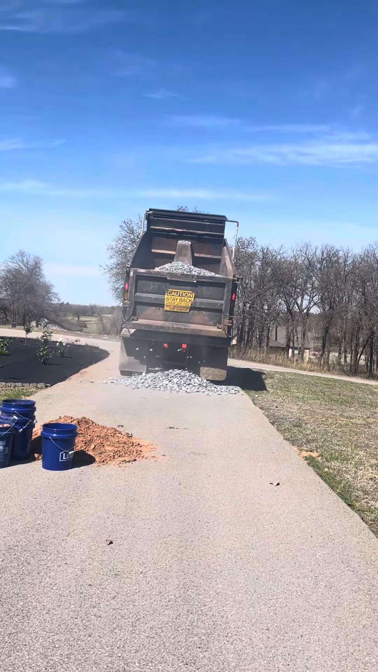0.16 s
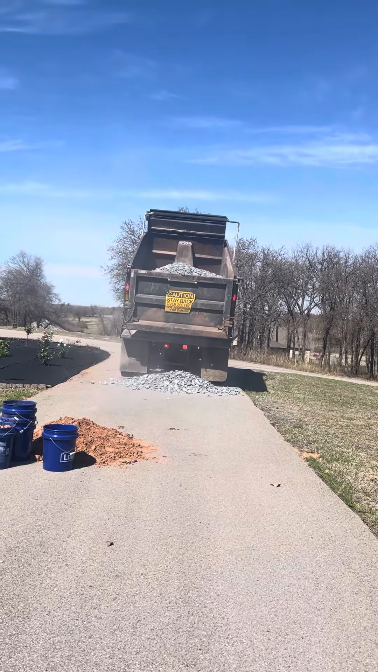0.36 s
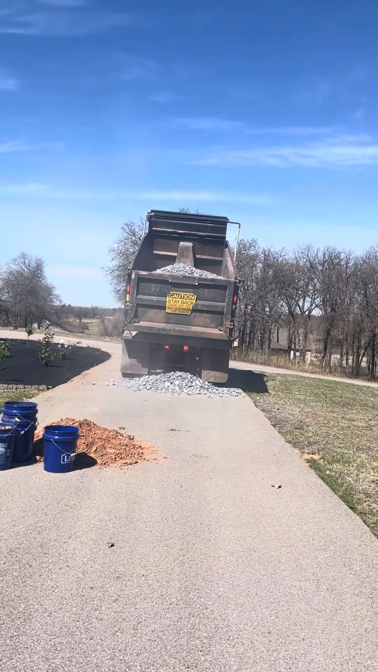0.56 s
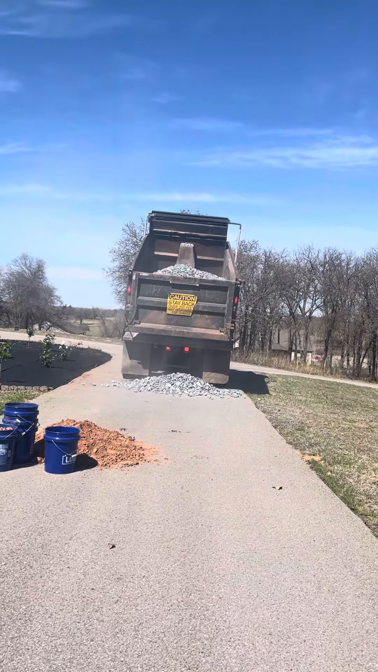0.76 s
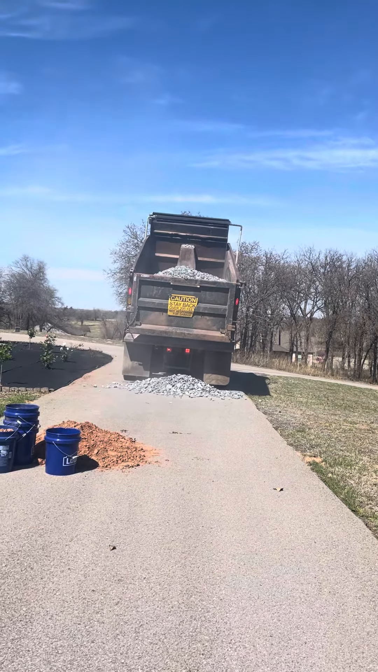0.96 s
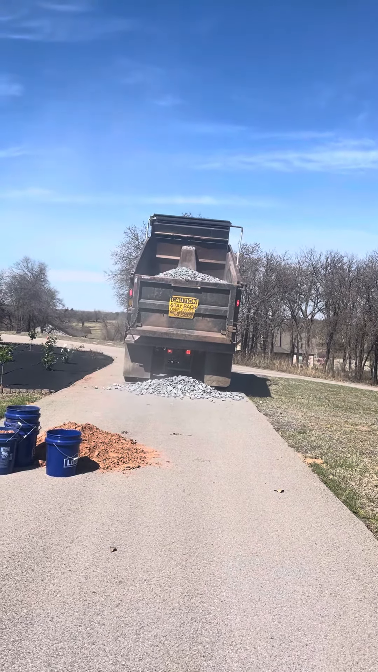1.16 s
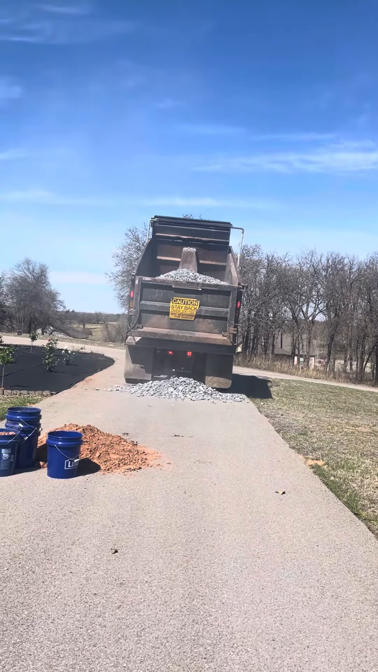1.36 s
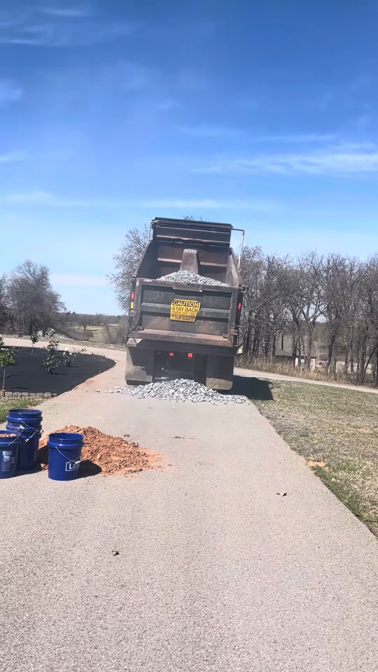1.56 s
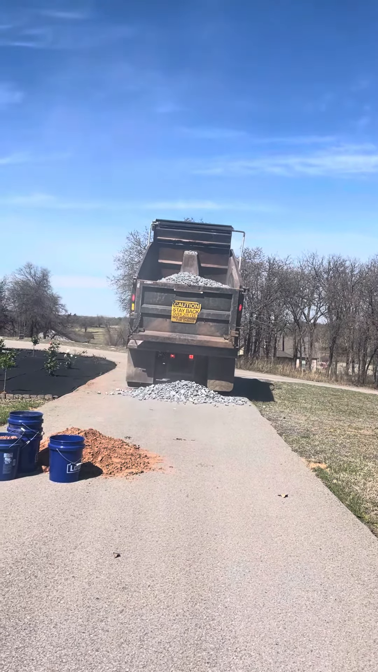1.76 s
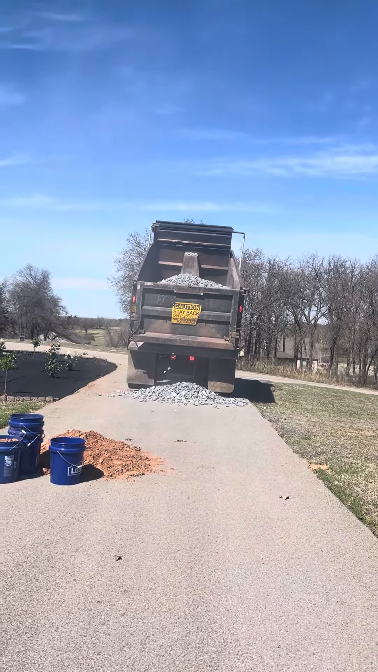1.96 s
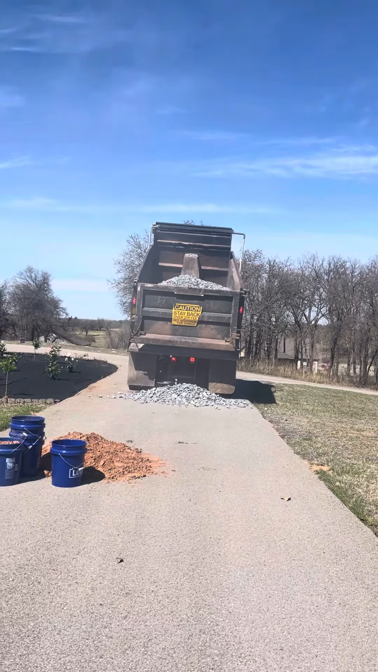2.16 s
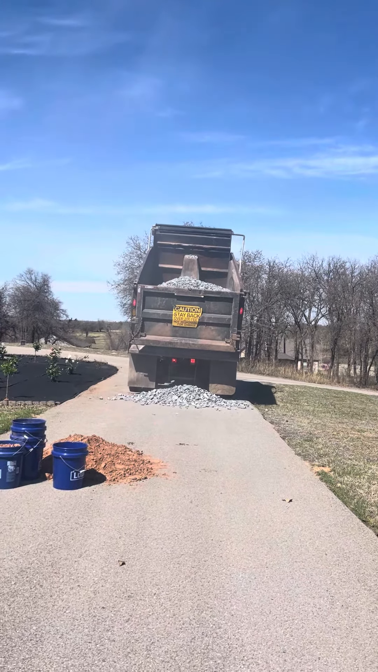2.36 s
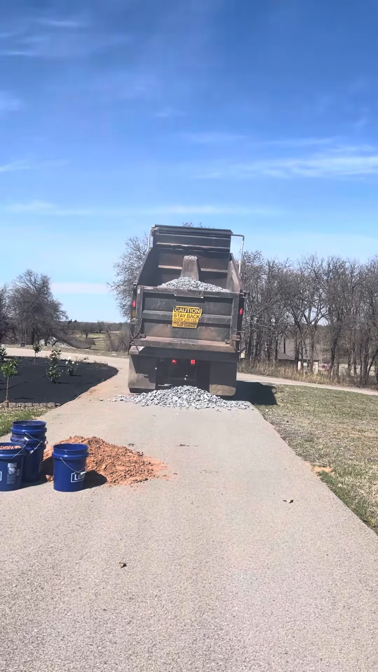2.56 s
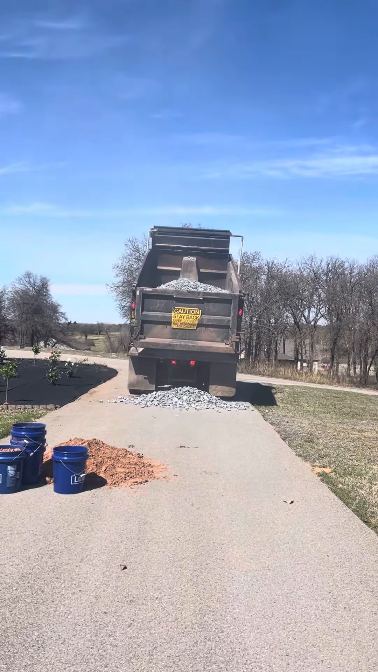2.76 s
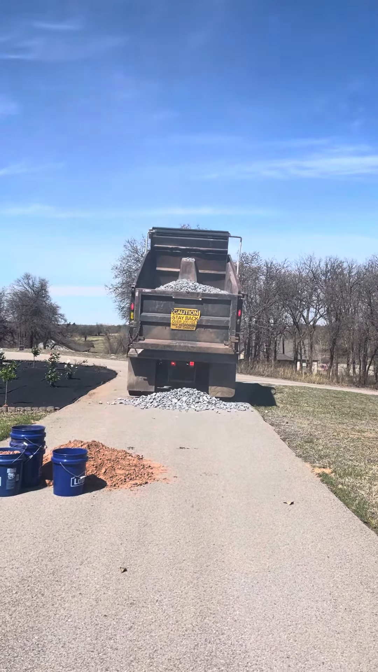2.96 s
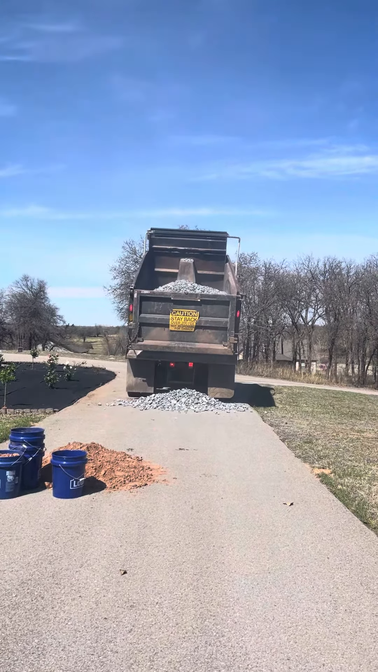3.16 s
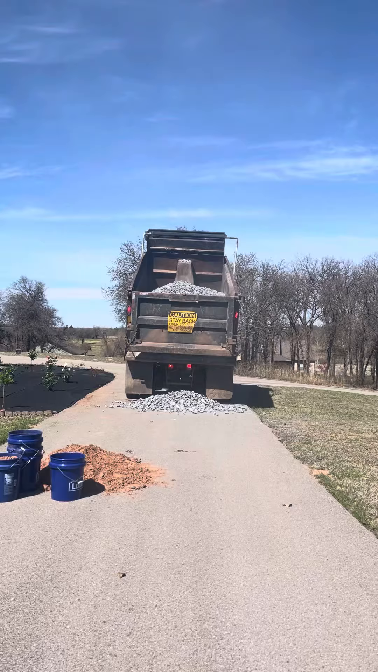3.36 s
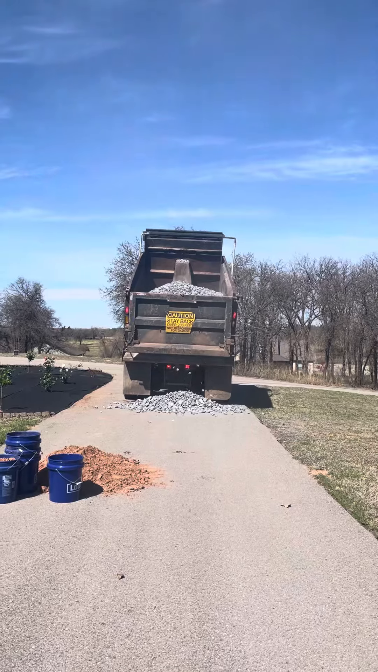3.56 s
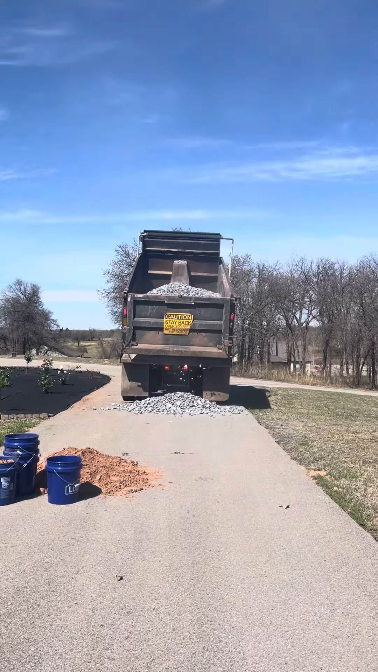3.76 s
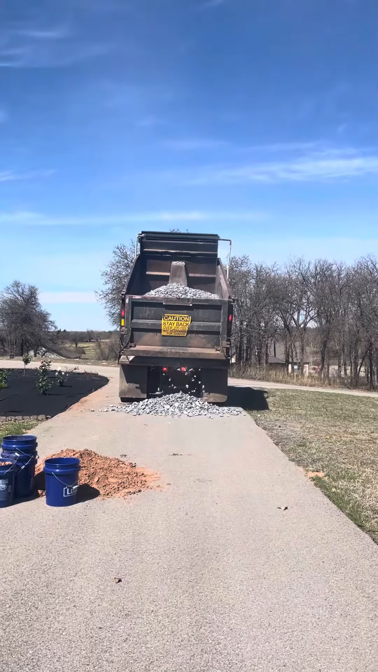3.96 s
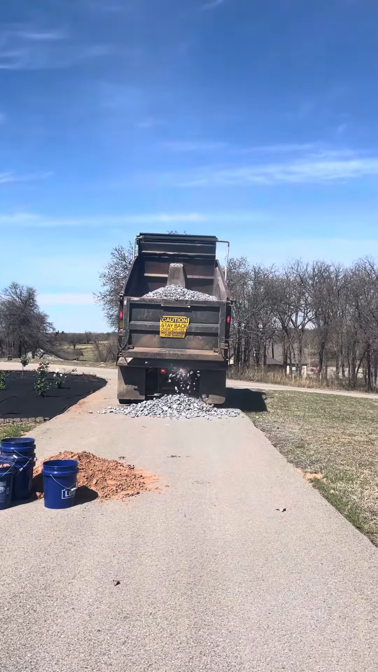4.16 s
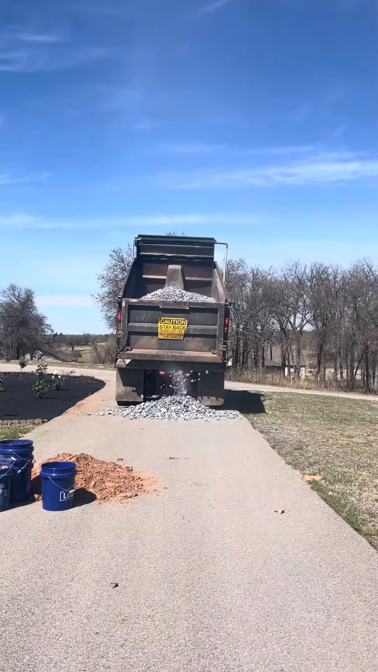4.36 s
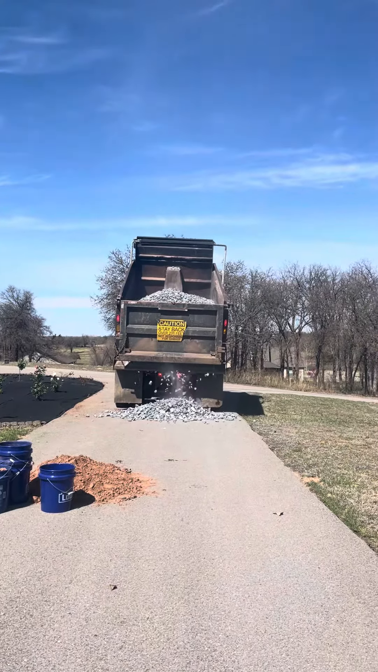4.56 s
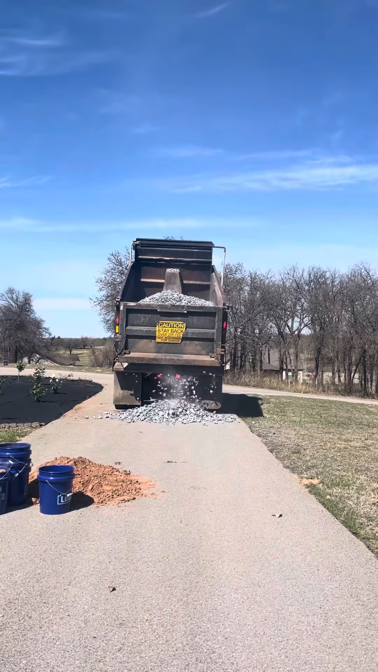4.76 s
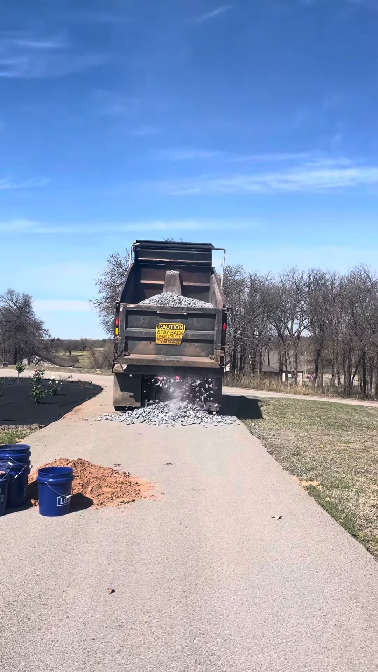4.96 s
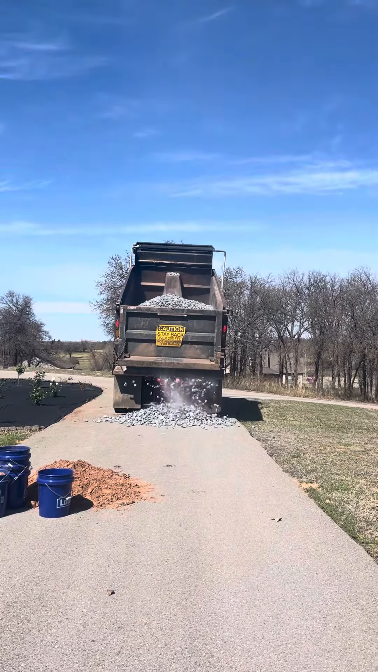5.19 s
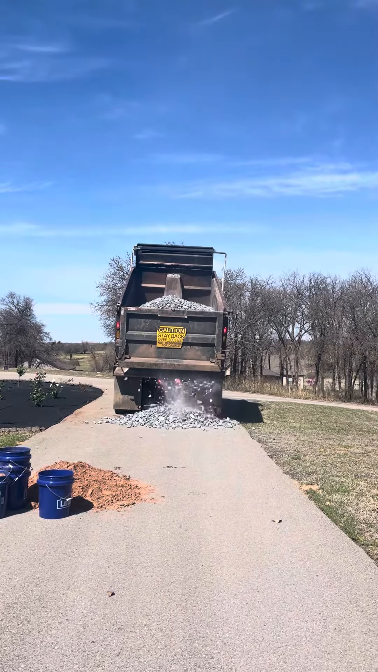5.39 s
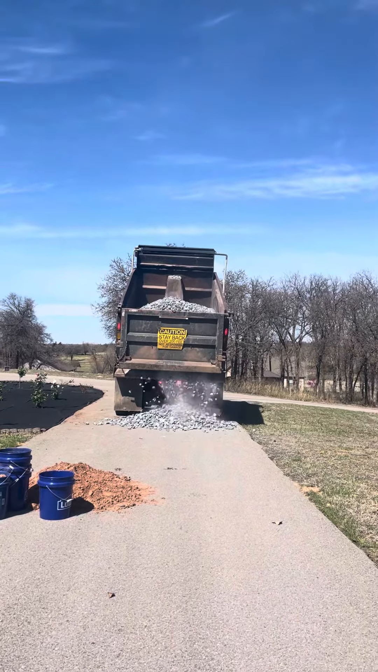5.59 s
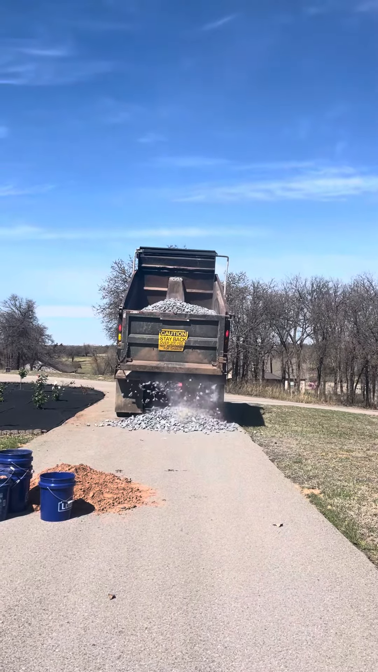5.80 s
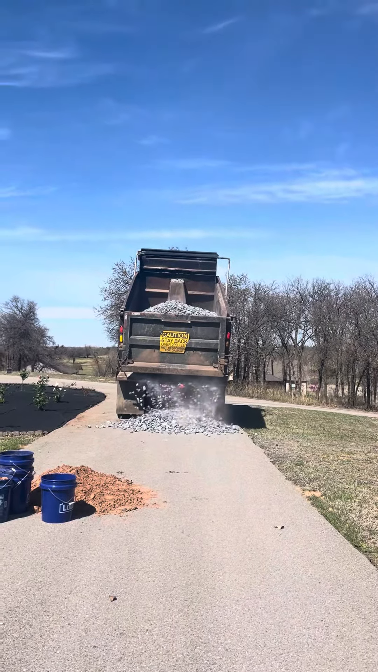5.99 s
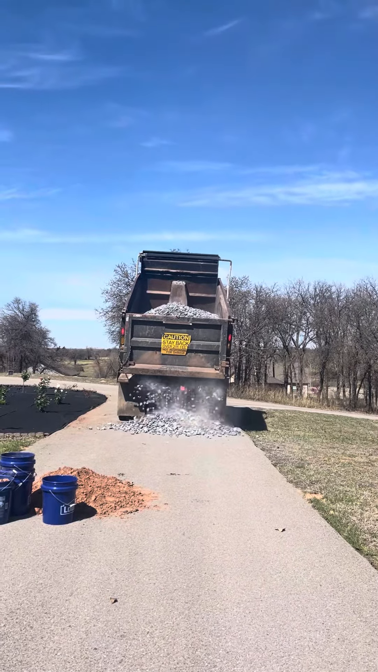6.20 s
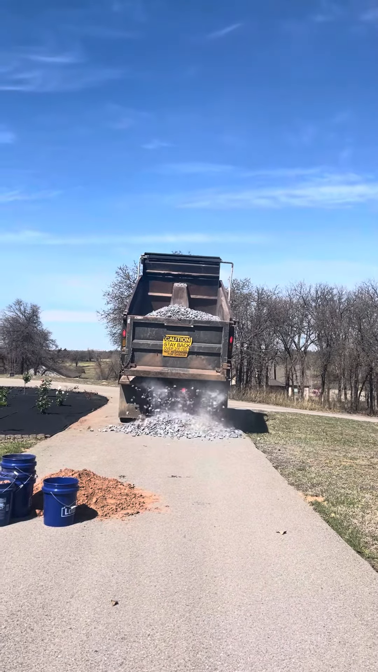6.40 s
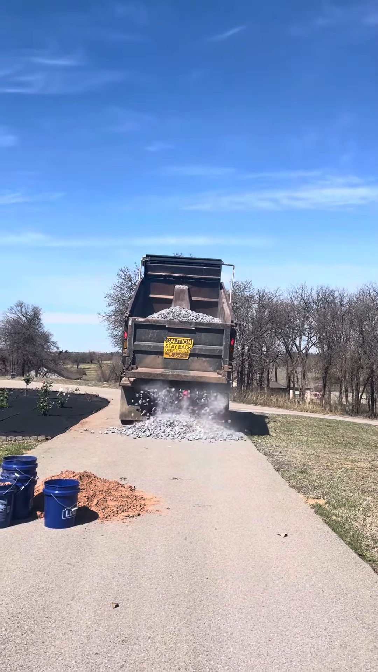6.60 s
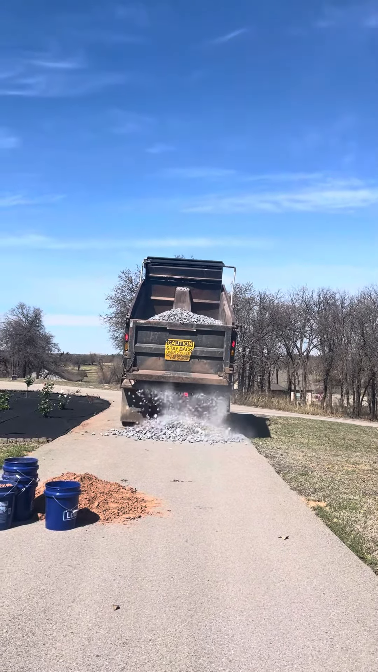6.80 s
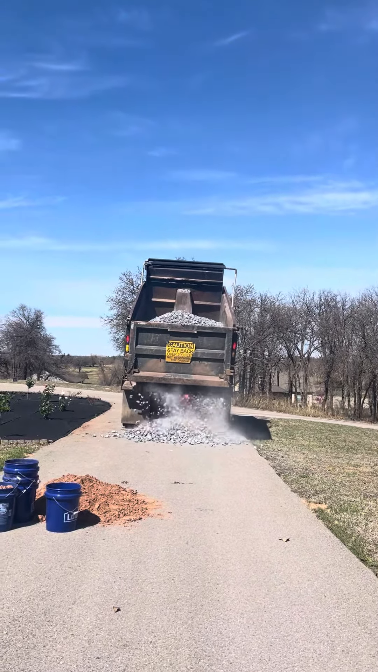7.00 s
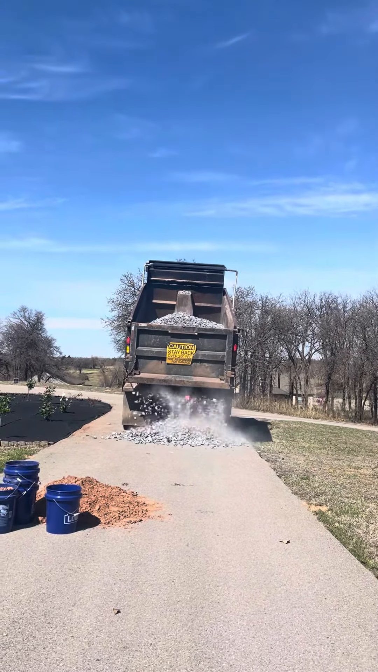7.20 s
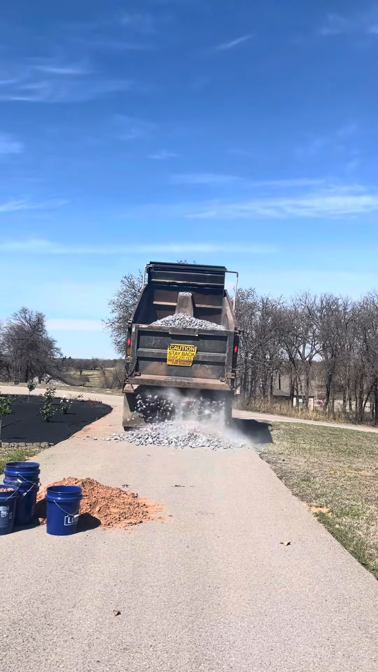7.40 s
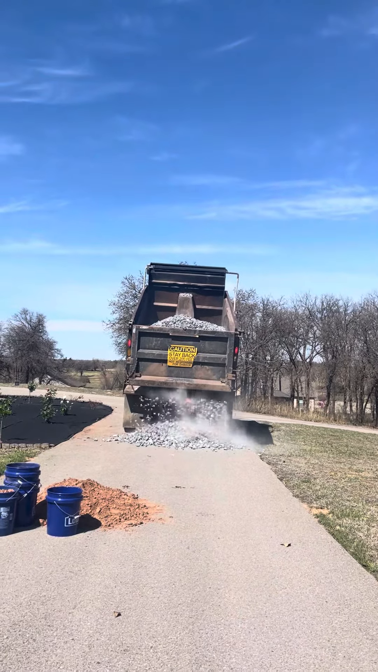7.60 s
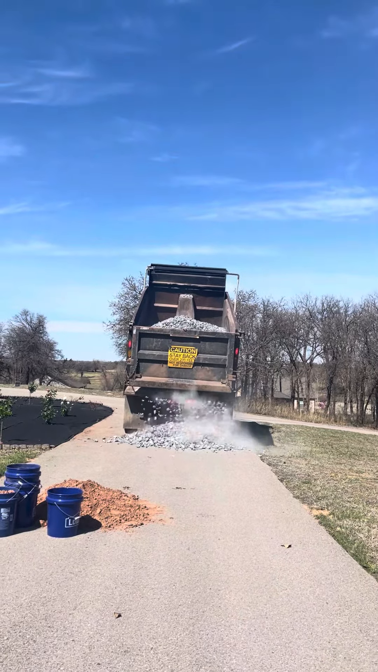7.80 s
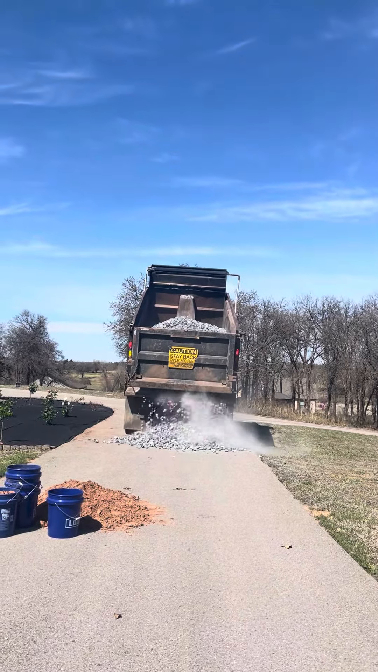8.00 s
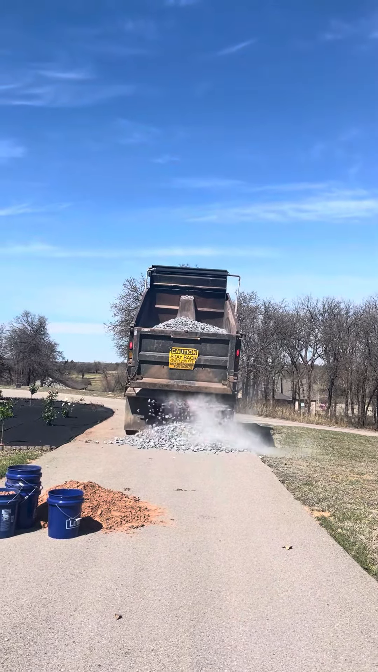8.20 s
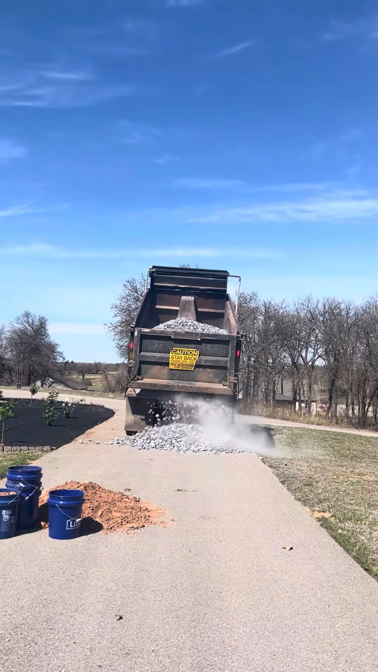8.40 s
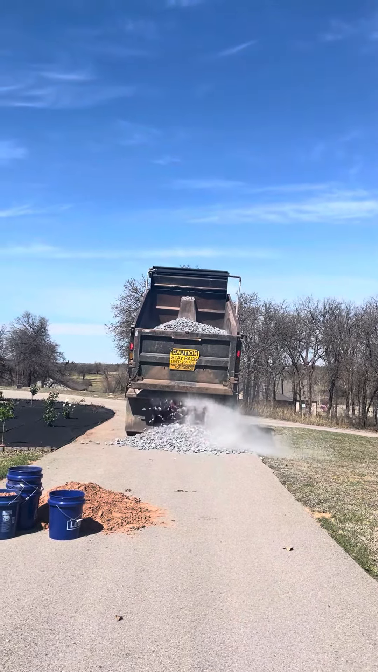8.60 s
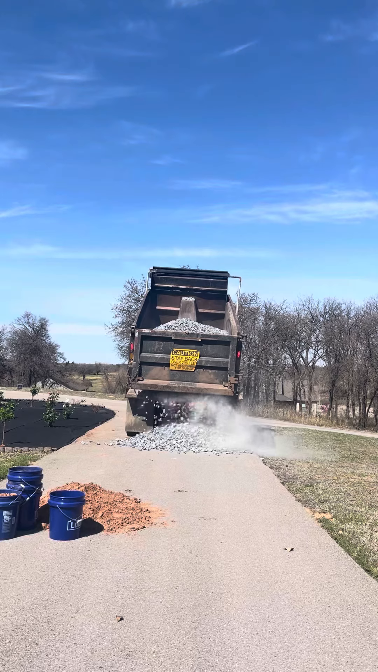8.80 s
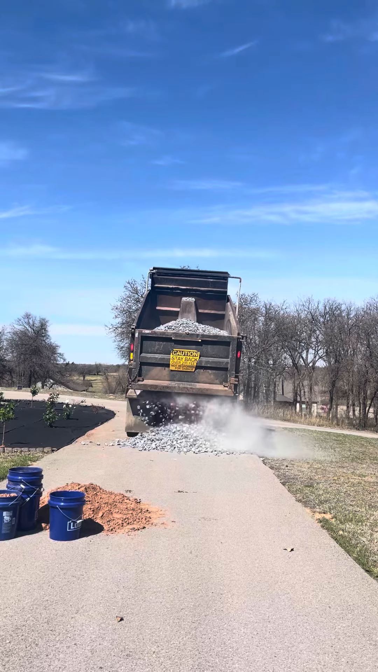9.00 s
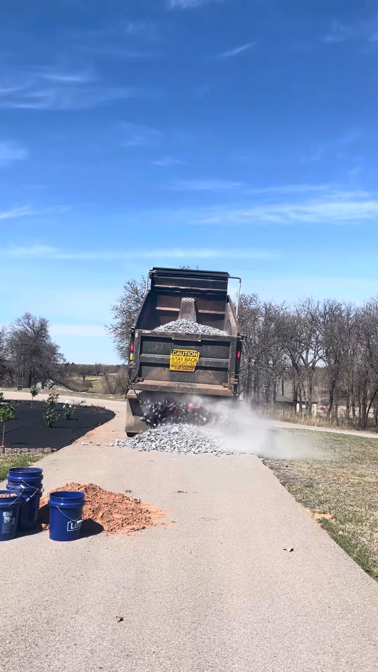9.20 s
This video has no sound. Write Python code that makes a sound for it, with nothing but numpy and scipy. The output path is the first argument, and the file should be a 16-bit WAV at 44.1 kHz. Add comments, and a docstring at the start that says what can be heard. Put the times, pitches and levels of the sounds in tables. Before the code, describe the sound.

Low throbbing diesel and pump drone run throughout. At first sparse clinks, tinny pings and dry ticks come from loose stones on steel and pavement, with a busier tumble near two seconds. Then quick tailgate rattles swell into a heavy stream of rock, thick with clanks, stony clacks, gritty hiss and dull low booms, staying loud until it cuts off. Open air, dry, heard in stereo from behind the truck.

```python
"""A dump truck stands on a paved drive with its bed raised; diesel and hoist pump hum throughout.
At first single stones tumble on the steel bed, knock the tailgate until it pings, and crack on the pavement.
After some three and a half seconds the gate clatters and the load lets go: crushed rock pours out in a dense
clatter that lasts to the end. Blows are noise bursts rung through the bed's modes, with struck modes,
pings, slumps and booms added; the engine is a sum of shaft harmonics over throbbing noise."""
import sys
import numpy as np
from scipy import signal
from scipy.fft import rfft, irfft, next_fast_len
from scipy.io import wavfile

SR = 44100
rng = np.random.default_rng(int(sys.argv[2]) if len(sys.argv) > 2 else 0)


def dump_mix(stems):
    """Bounce the given channels to the path in sys.argv[1] as a 16-bit WAV at rate SR."""
    frames = np.atleast_2d(stems).T  # one column per channel
    limited = np.clip(frames, -1, 1)  # hard clip at full scale
    pcm = np.round(limited * 32767).astype(np.int16)
    wavfile.write(sys.argv[1], SR, pcm)


N = 407922
TIME = np.arange(N) / SR
SIZE = next_fast_len(N + SR // 2, True) // 2 * 2   # even FFT length with room for ringing
HZ = np.maximum(np.arange(SIZE // 2 + 1) * SR / SIZE, 1)

# loose stones crack on the pavement: [t/s, relative level/dB, weight from 0 chip to 1 rock]
PAVEMENT_HITS = [(.0223, -48, 0.39), (0.189, -48, 0.31), (.1955, -38.5, 0.58), (0.285, -45, 0.35),
                 (0.309, -40.5, 0.75), (0.4213, -54, 0.74), (.4450, -57, 0.3), (0.505, -44.5, 0.66),
                 (.5470, -49, 0.63), (0.633, -47, 0.5), (0.712, -46, 0.52), (0.942, -42, 0.47),
                 (1.045, -50, 1), (1.166, -54, 0.83), (1.176, -44, 0.77), (1.271, -43.5, 0.34),
                 (1.298, -54, 0.55), (1.437, -48.5, 0.64), (1.5620, -51, 0.73), (1.636, -61, 0.84),
                 (1.826, -41, 0.63), (1.852, -47, 0.29), (1.9074, -45.5, 0.63), (2.061, -43.5, 0.53),
                 (2.09, -42, 0.55), (2.188, -44, 0.61), (2.217, -42, 0.61), (2.422, -46.5, 0.69),
                 (2.6360, -48, 0.58), (2.734, -44.5, 0.52), (2.827, -41.5, 0.45), (3.174, -44, 0.67),
                 (3.3450, -58, .5), (3.614, -35, 0.65), (3.7295, -48, 0.44), (3.917, -35.5, 0.31),
                 (4.156, -43, 0.22), (4.2897, -38, 0.28), (4.348, -39, 0.19), (4.42, -40, 0.37),
                 (4.608, -37, 0.35), (5.2446, -45, 0.41), (5.322, -43, 0.2), (6.043, -48, 0.088),
                 (8.231, -51.5, 0.03)]
# stones knock against the tailgate: [t/s, relative knock level/dB, relative ping level/dB]
GATE_HITS = [(0.0223, -38, -29), (0.0385, -28.5, -17.5), (.1087, -31, -21), (0.203, -34, -21),
             (0.3058, -41, -22), (0.9393, -31, -13), (1.042, -27, -11), (1.1081, -31.5, -24),
             (1.812, -31, -21), (1.853, -39, -25), (2.293, -29.5, -15.5), (2.8, -28, -12.5),
             (3.0407, -34.5, -16.5), (3.067, -30, -15), (3.104, -33, -20), (3.136, -26.5, -18),
             (3.229, -35, -16), (3.3396, -36, -24), (3.4222, -24, -11), (3.446, -22.5, -11),
             (3.4845, -22, -28), (3.525, -19.5, -9), (3.571, -16.5, -8), (3.607, -19.5, -12),
             (3.68, -13.5, -9), (3.7091, -12, -17), (3.7375, -16, -7), (3.83, -17, -13), (4.464, -16, -15),
             (5.706, -15, -29)]
# resonances of the steel bed and the air between its walls: [f/Hz, width/Hz, lift/dB]
BED_MODES = [(218, 18, 7), (300, 22, 12.3), (605, 20, 5), (645, 14, 8), (725, 24, 4), (808, 30, 12),
             (875, 16, 9), (917, 18, 17), (1020, 20, 10), (1050, 14, 9), (1110, 11, 14), (1184, 11, 15.5),
             (1263, 11, 13), (1345, 12, 14.5), (1431, 40, 5.5), (1547, 18, 6), (1650, 50, 4), (1765, 42, 9),
             (1894, 16, 8), (1945, 20, 4), (2025, 20, 3), (2110, 22, 2.5), (2207, 35, 6), (2271, 22, 8),
             (2368, 25, 4), (2562, 25, 3), (2680, 26, 7), (2820, 70, 7), (3014, 35, 4.5), (3125, 28, 4.5),
             (3280, 40, 2.5), (3843, 80, 5.5), (5673, 150, 5)]


def single_stones(bed_hits):
    """Impact excitation: each stone heard alone drives four bands, thud, clank, clink and crack."""
    s, (thud_db, clank_db, clink_db, crack_db) = blows(bed_hits)
    rebound_s = s + rng.uniform(.004, .012, len(s))
    grind = from_db(1.5)   # height of the brief grind over the dying shower
    thud_blows = bouncing(s, rebound_s, from_db(thud_db + 2.5))
    clank_blows = bouncing(s, rebound_s, from_db(clank_db - 7.5))
    clink_blows = bouncing(s, rebound_s, from_db(clink_db - 3.5))
    crack_blows = impulses(s, from_db(crack_db + 5.5))
    thud = rattle(thud_blows, t60=0.17, snap=0.03, grain_db=3.5)
    clank = rattle(clank_blows, t60=0.17, snap=0.1, grain_db=4.0, grind=grind, clump_db=4.5)
    clink = rattle(clink_blows, t60=0.24, snap=0.1, grain_db=3.5, grind=grind, clump_db=1.5)
    crack = rattle(crack_blows, t60=0.11, snap=0.14, grain_db=6.0, grind=grind, clump_db=3.0)
    return np.array([thud, clank, clink, crack + chips() + skips()])


def blows(bed_hits):
    """Impact spectra: surface, strength and weight set each blow's (thud, clank, clink, crack) levels."""
    # how a blow of middle weight divides: [thud/dB, clank/dB, clink/dB, crack/dB]
    on_pavement = (-4.5, 8.5, 4.5, 2.5)
    on_gate = (-11.5, 4, -1, -13)
    on_bed = (-11, -3.5, -16, -27)
    # what the step from chip to rock adds: [thud/dB, clank/dB, clink/dB, crack/dB]
    pavement_weight = (49, 26, 22, 5)
    bed_weight = (22.5, 11, -21.5, -22)
    pavement_s, db, weight = np.transpose(PAVEMENT_HITS)
    pavement = db[:, None] + on_pavement + np.outer(weight - .5, pavement_weight)
    gate_s, db, _ = np.transpose(GATE_HITS)
    gate = on_steel(db, on_gate)
    bed_s, db, weight, _ = np.transpose(bed_hits)
    floor = on_steel(db, on_bed) + np.outer(weight - .5, bed_weight)
    return np.concatenate([pavement_s, gate_s, bed_s]), np.vstack([pavement, gate, floor]).T


def on_steel(db, surface):
    """Nonlinear impact on steel: the crack grows less than the blow, so harder blows sound duller."""
    dulling, middling_blow_db = 0.84, -31   # dB lost for each dB above a middling blow
    levels = db[:, None] + surface
    levels[:, -1] -= dulling * (db - middling_blow_db)
    return levels


def bouncing(s, rebound_s, heights, share=0.19):
    """Energy division: an angular stone lands on one corner and tips onto another with a share of the energy."""
    share = np.clip(share, 0, 1)
    return impulses(s, heights * np.sqrt(1 - share)) + impulses(rebound_s, heights * np.sqrt(share))


def skips(level_db=11.5, chip_db=43.5, low_cut_hz=5500, count=3):
    """Inelastic rebound: a dry, high tick on the pavement, then weaker skips; light chips tick hardest."""
    skip_s, shrink, loss_db = 0.013, 0.67, 8   # nominal first gap, its share left for the next, loss per skip
    s, db, weight = np.transpose(PAVEMENT_HITS)
    ticks = np.zeros(N)
    for k in range(count):
        ticks += impulses(s, from_db(db + level_db + chip_db * (.5 - weight) - k * loss_db))
        s = s + skip_s * shrink ** k * rng.uniform(0.36, 1.2, len(s))
    high_pass = signal.butter(2, low_cut_hz, "high", fs=SR)
    return signal.lfilter(*high_pass, rattle(ticks, t60=0.063, snap=0.26, grain_db=4.0))


def chips(per_s=20, level_db=-30.5, follows=0.37):
    """Random point process: chips fly from the gate and tick on the pavement, harder in a fuller flow."""
    sizes = from_db(5 * np.clip(rng.standard_normal(N), -2, 1.5))
    ticks = (rng.random(N) < per_s / SR) * sizes
    return with_flow(level_db, follows) * rattle(ticks, t60=0.018, snap=0.24, grain_db=13.0)


def sliding_load(falls_per_s=330):
    """Granular flow: stones of uneven size land at random; one stream of falls drives the lows, another the
    highs."""
    sizes = from_db(4 * np.clip(rng.standard_normal(N), -2, 2))
    low_falls, high_falls = (rng.random((2, N)) < falls_per_s / SR) * sizes
    thud = rms_one(rattle(low_falls, t60=0.28, snap=0.7, grain_db=2.0))
    clank = rms_one(rattle(low_falls, t60=0.18, snap=0.39, grain_db=4.5))
    clink = rms_one(rattle(high_falls, t60=0.18, snap=0.18, grain_db=4.0, clump_db=1.0))
    crack = rms_one(rattle(high_falls, t60=0.36, snap=0.48, grain_db=2.0, clump_db=0.5))
    return np.array([
        with_flow(level_db=-25.5, follows=0.92) * thud,
        with_flow(level_db=-22, follows=1.26) * clank,
        with_flow(level_db=-26.5, follows=0.99) * clink,
        with_flow(level_db=-26.5, follows=0.83) * crack])


def flow_at(s):
    """Flow rate as a level: a trickle over the tailgate until the load lets go."""
    # flow of rock: [t/s, level/dB]
    flow = [(0.0, -35.5), (0.49, -58), (0.95, -56.5), (1.11, -57), (1.65, -65), (1.88, -79), (2.09, -57),
            (2.68, -53.5), (3.45, -40.5), (3.6, -36), (3.71, -28.5), (4.22, -23.5), (4.77, -20),
            (5.35, -22.5), (6.93, -22.5), (8.45, -25.5), (8.57, -27.5), (8.75, -25), (9.25, -24)]
    return np.interp(s, *np.transpose(flow))


def with_flow(level_db, follows):
    """Gain law of the pour: level at full flow, and the share of the flow's swing that is followed."""
    full_flow_db = -23
    return from_db(level_db + follows * (flow_at(TIME) - full_flow_db))


def middling_rocks(per_s=22, start_s=3.8, above_flow_db=2.5, spread_db=3):
    """Stratified random arrivals: rocks of the pour as rows like the bed hits, louder in a fuller flow."""
    pour_s = N / SR - start_s
    when, weight, size, spot = rng.random((round(per_s * pour_s), 4)).T
    s = start_s + (np.arange(len(when)) + when) / len(when) * pour_s
    db = flow_at(s) + above_flow_db + spread_db * (2 * size - 1)
    spot_hz = np.interp(spot, [0, 1], (1050, 2900))
    return np.transpose([s, db, weight / 2, spot_hz])


def clacks(per_s=70, level_db=-12.0, cycles=24, overtone=1.68, count=22):
    """Free vibration: rock knocks on rock in the pour and rings two short partials at the stone's pitch."""
    sizes = from_db(5 * np.clip(rng.standard_normal(N), -2, 1.5)) * rng.choice([-1, 1], N)
    knocks = sizes * (rng.random(N) < per_s / SR)
    dealt = rng.integers(0, count, N)   # which pitch each knock gets
    rings = 0
    for k, hz in enumerate(np.geomspace(1150, 3700, count)):
        own = knocks * (dealt == k)
        upper_hz = hz * overtone
        rings = rings + ring(own, hz, cycles / hz) - ring(own, upper_hz, cycles / upper_hz) / 2
    return from_db(flow_at(TIME) + level_db) * rms_one(rings)


def bed(drives, knocks, liveliness=1.184):
    """Resonant filtering: contacts ring through the bed's modes; liveliness is an exponent on their lift."""
    # spectra of the four drives: [f/Hz, relative level/dB]
    thud_spectrum = [(60, -11), (160, -16), (240, -5.5), (370, 3), (440, -5.5), (545, -9.5), (620, 0),
                     (800, 0), (1000, 0.5), (1300, -6.5), (2000, -44), (5000, -55)]
    clank_spectrum = [(200, -11.5), (390, -9), (550, -16), (700, -13), (1200, -17), (1500, 1.5), (1800, -2),
                      (2100, -2.5), (2400, -3.5), (3200, -12), (13000, -53.5)]
    clink_spectrum = [(500, -35), (1800, -5.5), (2400, 1.5), (2900, 2), (3200, 4.5), (4100, 3),
                      (5000, -7.5), (7000, -13), (13000, -36)]
    crack_spectrum = [(400, -35), (1500, -24), (3000, 7), (4500, 10.5), (6000, 1), (7300, 3.5),
                      (8500, -0.5), (12000, -9.5)]
    power = 1 + sum((from_db(db) ** 2 - 1) / (1 + (2 * (HZ - hz) / width) ** 2) for hz, width, db in BED_MODES)
    lift = np.sqrt(power.clip(0)) ** liveliness
    out = 0
    for drive, spectrum in zip(drives, [thud_spectrum, clank_spectrum, clink_spectrum, crack_spectrum]):
        out = out + colour(drive, rms_one(lift * from_db(over_hz(spectrum))))
    out[0] += colour(knocks, lift / 2)
    return out


def struck_spots(bed_hits, level_db=-5.5, reach_octaves=0.091, damping=0.79, spread_db=10.0, gate_hz=1900,
                 gate_db=-6.0, floor_hz=900, floor_db=-12.0, weight_db=13.0):
    """Modal excitation: a knock rings the modes near its own pitch in a new mix, then the floor plate by weight."""
    rebound_s = 0.00817   # from a rock's first touch to its full weight on the floor plate
    spots = [(s, db, hz) for s, db, _, hz in bed_hits]
    spots += [(s, db + gate_db, gate_hz) for s, db, _ in GATE_HITS]
    spots += [(s + rebound_s, db + floor_db + weight_db * (weight - .5), floor_hz) for s, db, weight, _ in bed_hits]
    s, db, spot_hz = np.transpose(spots)
    mode_hz, width, lift_db = np.transpose(BED_MODES)
    shares = np.exp(-(np.log2(mode_hz / spot_hz[:, None]) / reach_octaves) ** 2)
    shares = shares * from_db(lift_db + spread_db * rng.standard_normal(shares.shape))
    shares = shares * rng.choice([-1, 1], shares.shape)
    heights = from_db(db + level_db) * shares.T / np.linalg.norm(shares, axis=1)
    t60 = np.log(1000) / (np.pi * width * damping)   # a narrower mode rings longer
    return sum(ring(impulses(s, row), hz, decay) for row, hz, decay in zip(heights, mode_hz, t60))


def tailgate(level_db=-5.5, upper_db=-23.5, ping_hz=3845, upper_ratio=1.0, t60=.072, spread=0.0046, rise_s=0.0012):
    """Close modes interfere: two steel modes ping at each knock; rock leaning on the gate shifts their pitch."""
    out, age = np.zeros(N + SR), TIME[:SR // 5]
    shifts = rng.standard_normal((len(GATE_HITS), 2))
    for (s, _, ping_db), (shift, gap) in zip(GATE_HITS, shifts):
        angle = 2 * np.pi * ping_hz * (1 + spread * shift) * age
        pair = np.sin(angle) + from_db(upper_db) * np.sin(angle * (upper_ratio + spread * gap))
        envelope = from_db(ping_db + level_db - 60 * age / t60) * (1 - np.exp(-age / rise_s))
        out[round(s * SR):][:len(age)] += envelope * pair
    return out[:N]


def slumps(hz=299, rise_s=0.024, level_db=-1.5):
    """Soft excitation: a mass of rock drops against the bed and a low resonance swells and dies."""
    # slumps that make the bed drone: [t/s, relative level/dB]
    drops = [(1.863, -39), (3.792, -39), (3.921, -24), (4.003, -25), (4.368, -37), (4.644, -22.5),
             (4.865, -21), (5.193, -20.5), (5.715, -24), (6.119, -24), (6.7, -24), (7.347, -24),
             (7.722, -24), (8.234, -23), (8.712, -20), (8.945, -20.5)]
    s, db = np.transpose(drops)
    age = TIME[:SR // 2]
    swell = age / rise_s * np.exp(1 - age / rise_s) * np.sin(2 * np.pi * hz * age)
    return signal.fftconvolve(impulses(s, from_db(db + level_db)), swell)[:N]


def booms(centre_hz=75, fall_db=14):
    """Low-frequency body vibration: the shifting load shakes the whole bed in a band about the centre."""
    # dull booms: [t/s, relative level/dB]
    shifts = [(2.759, -24), (3.623, -24), (4.169, -21), (4.324, -19), (8.645, -20), (8.719, -19.5)]
    s, db = np.transpose(shifts)
    shake = rattle(impulses(s, from_db(db - 7.5)), t60=0.4, snap=0.8, grain_db=14.0)
    return colour(shake, rms_one(from_db(-fall_db * np.log2(HZ / centre_hz) ** 2)))


def diesel(surge_db=1.05, throb=0.18, noise_db=-40.5, noise_follows=0.7):
    """Harmonic series of rotation: engine and geared hoist pump beat; noise throbs with each pump turn."""
    # load on the diesel: [t/s, relative level/dB]
    engine_load = [(0.0, -38.5), (1.49, -37.5), (3.2, -36), (4.6, -35), (6.65, -41.5), (9.25, -44)]
    # hum of the diesel: [multiple of its firing cycle rate, relative level/dB]
    engine_orders = [(3, -22), (4, -8), (5, -7.5), (6, -19), (7, -11.5), (10, -17.5), (11, -22),
                     (12, -15.5), (13, -16.5), (15, -17.5), (16, -16)]
    # hum of the hoist pump: [multiple of its shaft rate, relative level/dB]
    pump_orders = [(4, 0.5), (5, -2)]
    # upper hum of the pump: [multiple of its shaft rate, relative level/dB]
    upper_orders = [(6, -9.5), (7, -7), (8, -10.5)]
    # upper hum comes and goes with the oil pressure: [t/s, relative level/dB]
    upper_hum = [(0, 3.5), (.62, 3), (.9, -10.5), (3.1, -6.5), (3.6, 4), (4.5, -1), (5.4, -6), (7.0, -5.5),
                 (9.25, -2)]
    # broadband engine noise: [f/Hz, relative level/dB]
    noise_spectrum = [(22, -28), (34, -7), (50, 4.5), (75, 6.5), (125, 1.5), (180, -6), (320, -1),
                      (450, -10), (560, -20.5), (720, -4.5), (1000, -12), (2000, -15.5), (4000, -26.5),
                      (7000, -38), (13000, -68)]
    cycle_hz, pump_hz, speed_waver, roughness = 13.93, 16.24, .004, .2
    level_db, upper_db = in_time(engine_load), in_time(upper_hum)
    turning = 2 * np.pi * np.cumsum(1 + speed_waver * drift(1.925)) / SR   # angle of a 1 Hz shaft
    tones = shaft_tones(cycle_hz * turning, engine_orders, roughness)
    tones = tones + shaft_tones(pump_hz * turning, pump_orders, roughness)
    tones = tones + from_db(upper_db) * shaft_tones(pump_hz * turning, upper_orders, roughness)
    noise = rng.standard_normal((2, N)) * (1 + throb * np.cos(pump_hz * turning))
    noise_gain = from_db(noise_db + noise_follows * (level_db - level_db.mean()))
    out = noise_gain * colour(noise, rms_one(from_db(over_hz(noise_spectrum))))
    out[0] += from_db(level_db + 2.5 + surge_db * drift(11)) * rms_one(tones)
    return out


def shaft_tones(angle, orders, rough):
    """Order synthesis: sines on multiples of a turning shaft, each swelling and slipping in phase a little."""
    hum = 0
    for k, db in orders:
        swell = 1 + rough * drift(8.9)
        slip = rough * drift(3.18) + rng.uniform(0, 2 * np.pi)
        hum = hum + from_db(db) * swell * np.sin(round(k) * angle + slip)
    return hum


def rattle(blows, t60, snap, grain_db, grind=0, clump_db=0):
    """Exponential energy decay: a snap, brief grind and dying shower of clumped contacts; rows direct, scattered."""
    grind_t60 = 0.018   # s
    keep, grind_keep = from_db(-120 / (np.array([t60, grind_t60]) * SR))   # energy kept per sample
    energy = blows ** 2 + 1e-18
    power = signal.lfilter([1], [1, -keep], energy)
    power = power + signal.lfilter([grind ** 2], [1, -grind_keep], energy)
    clumps = clump_db * drift(400)
    unevenness = from_db(grain_db * rng.standard_normal(N) + clumps)
    shower = np.sqrt(power) * rms_one(rng.standard_normal((2, N)) * unevenness)
    shower[0] += snap * blows * rng.choice([-1, 1], N) / np.sqrt(1 - keep)
    return shower


def ring(clicks, hz, t60):
    """Damped oscillator: a unit click sets a sine of height 1 ringing."""
    r, w = from_db(-60 / (t60 * SR)), 2 * np.pi * hz / SR
    return signal.lfilter([0, np.sin(w)], [1, -2 * r * np.cos(w), r * r], clicks + 1e-18)


def impulses(times, heights):
    """Ideal impulses: one click at each time."""
    out = np.zeros(N)
    out[np.clip(np.round(times * SR).astype(int), 0, N - 1)] = heights
    return out


def response(gain):
    """Minimum phase by folding the cepstrum: resonances ring after a blow, never before it."""
    cepstrum = irfft(np.log(gain + 1e-9))
    cepstrum[1:SIZE // 2] *= 2
    cepstrum[SIZE // 2 + 1:] = 0
    return np.exp(rfft(cepstrum))


def colour(x, gain):
    """Linear filtering: multiply the spectrum by the minimum-phase response of this gain."""
    return irfft(rfft(x, SIZE) * response(gain))[..., :N]


def from_db(db):
    """Logarithmic level: decibels to amplitude gain."""
    return 10 ** (np.asarray(db) / 20)


def rms_one(x):
    """Normalisation by mean power: scale to unit rms."""
    return x / np.sqrt(np.mean(np.abs(x) ** 2) + 1e-20)


def in_time(rows):
    """Linear interpolation: a curve's value at every sample."""
    return np.interp(TIME, *np.transpose(rows))


def over_hz(points):
    """Logarithmic pitch scale: a table joined by straight lines over log frequency."""
    hz, value = np.transpose(points)
    return np.interp(np.log(HZ), np.log(hz), value)


def drift(rate):
    """Band-limited chance: random knots at this rate per second, joined by lines, rms 1."""
    knots = rng.standard_normal(4096)
    return rms_one(np.interp(TIME * rate, np.arange(len(knots)), knots))


def ports(x):
    """Interaural-style coherence: two ports share direct sound, the right one lagging; scattered sound differs."""
    # lag of the right port: [f/Hz, phase/rad]
    port_phase = [(20, 0), (390, 0), (580, 1.5), (800, 1.5), (1000, 3.1), (1430, 6.2), (1850, 6.3),
                  (2600, 7.7), (3500, 7.6), (3820, 6.3), (4850, 9.4), (5650, 12.5), (6700, 13),
                  (8350, 15.6), (9560, 15.8), (11800, 18.6), (13300, 18.85)]
    # left over right: [f/Hz, level/dB]
    port_balance = [(200, 0), (480, -2), (650, 0), (850, 6), (1150, 7), (1650, 2.5), (2500, 1.5), (3100, 5),
                    (3850, 5), (4700, 0)]
    # likeness of the two ports: [f/Hz, likeness from 0 to 1]
    port_likeness = [(400, 0.97), (1800, 0.99), (2400, 0.37), (2800, 0.85), (3750, 0.51), (4850, 0.92),
                     (5300, 0.081), (6000, 1), (7400, 0.18), (8500, 1), (9400, 1), (11000, 0.6),
                     (12200, 0.83)]
    direct, scattered = rfft(x, SIZE)
    alike = np.clip(over_hz(port_likeness), 0, 1)
    common, apart = np.sqrt(1 + alike) * direct, np.sqrt(1 - alike) * scattered
    tilt = from_db(over_hz(port_balance))
    left = (common + apart) * tilt
    right = (common - apart) * np.exp(-1j * over_hz(port_phase))
    return irfft(np.array([left, right]) / np.sqrt(1 + tilt ** 2))[:, :N]


def scene():
    """Superposition: rock, steel and engine all come from the back of the truck."""
    # rocks tumble on the bed: [t/s, relative level/dB, weight from 0 chip to 1 rock, struck spot f/Hz]
    tumbling_rocks = [(.002, -25, 0.055, 2820), (.1331, -19.5, 0, 2240), (.152, -22, 0.47, 2980),
                      (.1985, -28, 0.2, 1800), (.2957, -26, 0.043, 2240), (.3391, -28, 0, 1780),
                      (1.013, -17.5, 0.058, 1780), (1.029, -17, 0.18, 2250), (1.054, -23, .3, 1770),
                      (1.3604, -21.5, 0, 3010), (1.5405, -29.5, 0.035, 1700), (1.6495, -17, 0.2, 2000),
                      (1.652, -19, 0.4, 1410), (1.657, -9.5, 0.51, 794), (1.698, -9, 0.1, 2820),
                      (1.705, -13, 0.25, 2770), (1.7494, -17, 0.63, 1450), (1.756, -14, .35, 2230),
                      (1.797, -16.5, 0.23, 1770), (1.814, -21, 0.3, 2300), (1.855, -16, 0.4, 2280),
                      (1.865, -22.5, 0.46, 1345), (1.9715, -16, 0.62, 1860), (1.974, -19.5, 0.37, 2900),
                      (1.979, -19, 0.67, 1430), (2.08, -23, 0.34, 2820), (2.094, -30, 0.45, 2820),
                      (2.3352, -18, 0.12, 1760), (3.6523, -9.5, 0.17, 1580), (3.708, -9, 0.14, 1740),
                      (3.7803, -8, 0.39, 1490), (3.8003, -5, 0.46, 820), (3.826, -11, 0.27, 2830),
                      (3.895, -9.5, 0.21, 1720), (3.919, -14, 0.73, 1740), (3.9721, -6, 0.23, 1600),
                      (3.991, -8.5, 0.68, 1460), (4.0977, -2, 0.3, 1440), (4.16, -10, 0.25, 1760),
                      (4.269, -9.5, 0.17, 1750), (4.286, -14, 0.15, 812), (4.3382, -8.5, 0, 1710),
                      (4.378, -7.5, 0.22, 1370), (4.402, -21, 0.15, 1780), (4.462, -19, 0.13, 1770),
                      (4.489, -7, 0.12, 1790), (4.545, -10, 0.2, 1550), (4.577, -10, 0, 1770),
                      (4.6204, -6, 0.31, 1770), (4.639, -6.5, 0.44, 1770), (4.7377, -7, 0.6, 1730),
                      (4.751, -4.5, 0.31, 1400), (4.8281, -7, 0.57, 1760), (4.838, -15, .3, 1550),
                      (4.871, -10, 0.1, 1770), (4.899, -12, 0.47, 1890), (4.969, -11, 0.2, 1370),
                      (4.995, -9, .3, 1345), (5.025, -12, 0.13, 917), (5.068, -15, 0.17, 915),
                      (5.116, -7, 0.41, 1820), (5.1828, -5.5, 0.42, 1670), (5.209, -16, 0.77, 1250),
                      (5.51, -16, 0.96, 2270), (5.527, -15, 0.64, 1440), (5.659, -12, 0.59, 1720),
                      (5.707, -11, 0.41, 1770), (5.732, -15, 0.2, 1550), (5.786, -7.5, 0.15, 1760),
                      (5.891, -12, 0.067, 1700), (5.905, -14, .1, 2820), (6.0524, -13, 0.43, 1800),
                      (6.07, -9.5, 0.55, 1630), (6.125, -18, 0.52, 1780), (6.245, -15, 0.23, 1480),
                      (6.3429, -11.5, 0.1, 1740), (6.368, -11.5, 0.024, 1750), (6.403, -8.5, 0.25, 2820),
                      (6.502, -11, 0.61, 2980), (6.519, -7, 0.089, 1750), (6.594, -10.5, 0, 1780),
                      (6.675, -27, 0.16, 1550), (6.7906, -9.5, 0.64, 1750), (6.851, -14, 0.61, 1780),
                      (6.899, -9, 0.37, 1570), (7.046, -13, 0.76, 1440), (7.142, -8.5, 0.33, 1750),
                      (7.202, -10.5, 0.58, 2230), (7.4716, -13, 0.58, 1860), (7.526, -15, 0.55, 812),
                      (7.7031, -7, 0.47, 1780), (7.709, -12, 0.61, 812), (7.745, -11, 0.39, 910),
                      (7.8777, -9, 0.35, 1660), (7.9266, -11, 0.27, 1660), (8.006, -13, 0.28, 794),
                      (8.096, -12.5, 0.25, 1470), (8.2388, -15, 0.72, 1810), (8.29, -10, 0.22, 1760),
                      (8.503, -10, 0.34, 800), (8.599, -11, 0.17, 1540), (8.6856, -13, 0.56, 1670),
                      (8.7, -7, 0.39, 800), (8.722, -12.5, 0.34, 1530), (8.819, -11, 0.61, 1780),
                      (8.848, -20.5, 1, 1550), (8.958, -13.5, 0.64, 1740), (9.028, -13, 0.65, 1680),
                      (9.082, -12, 0.53, 1620), (9.1167, -9, 0.36, 1790), (9.16, -10.5, 0.49, 1740)]
    bed_hits = np.vstack([tumbling_rocks, middling_rocks()])
    truck = bed(single_stones(bed_hits) + sliding_load(), clacks()) + booms() + diesel()
    truck[0] += struck_spots(bed_hits) + tailgate() + slumps()
    return ports(truck)


def record(dry):
    """Transducer response and saturation: a high-treble peak, rounded tallest peaks and a cut top."""
    # microphone response: [f/Hz, gain/dB]
    microphone = [(22, -13), (38, -1.5), (8300, -3.5), (10200, 9), (11600, 4), (12500, -7), (13600, -33)]
    heard = colour(dry, from_db(over_hz(microphone)))
    heard = heard / (1 + (heard / .85) ** 6) ** (1 / 6)
    stop_hz = 13700 * 1.12   # from here up at least 60 dB down
    return signal.sosfilt(signal.cheby2(12, 60, stop_hz, fs=SR, output="sos"), heard)


dry = scene()
out = record(dry)
dump_mix(out)
```